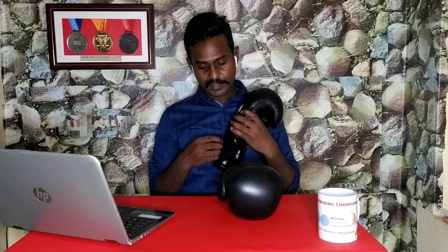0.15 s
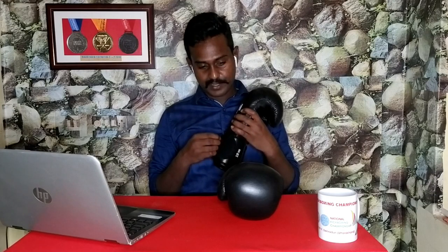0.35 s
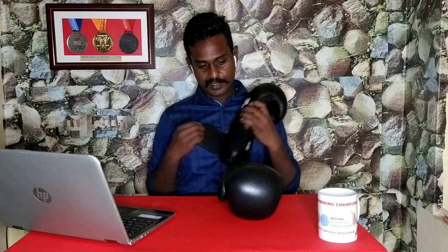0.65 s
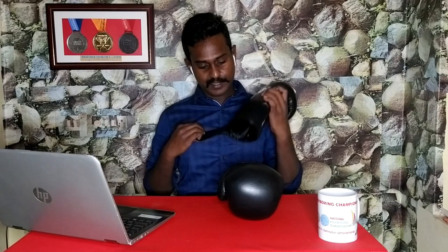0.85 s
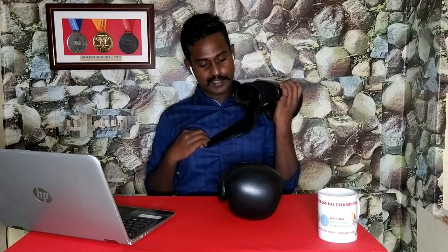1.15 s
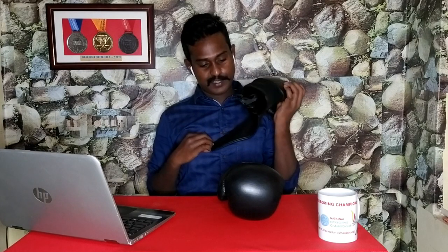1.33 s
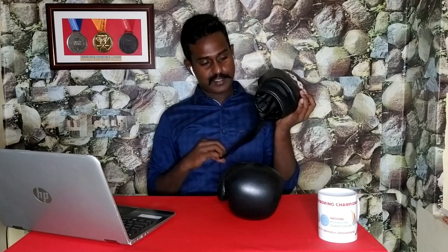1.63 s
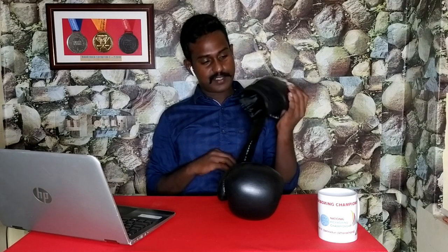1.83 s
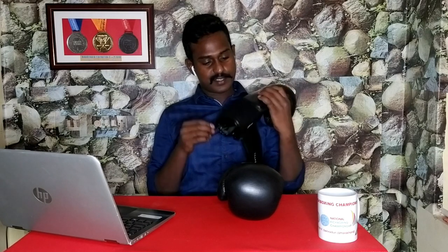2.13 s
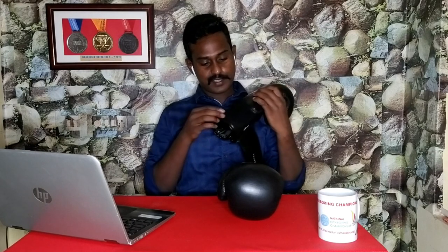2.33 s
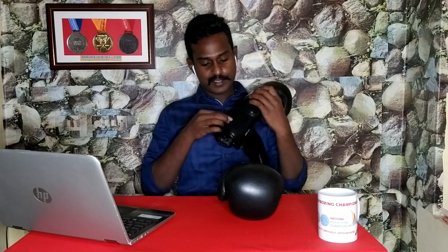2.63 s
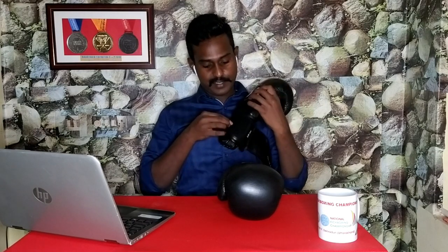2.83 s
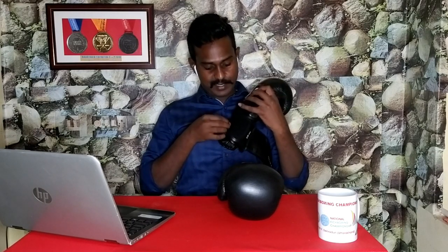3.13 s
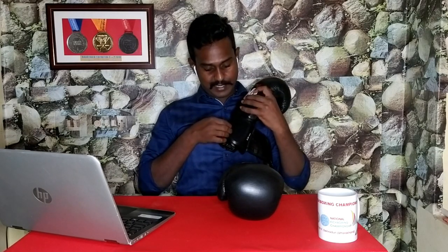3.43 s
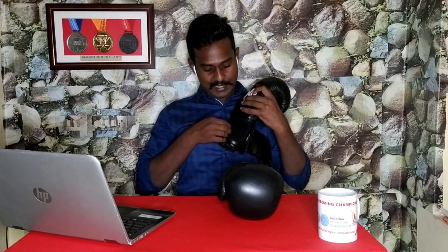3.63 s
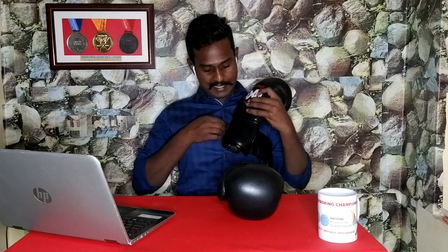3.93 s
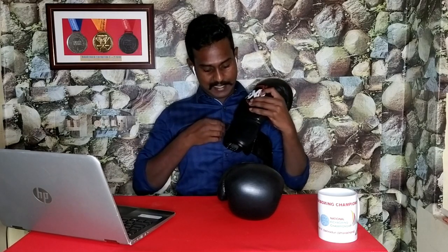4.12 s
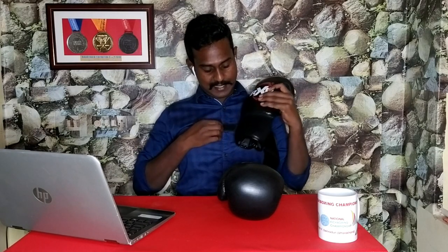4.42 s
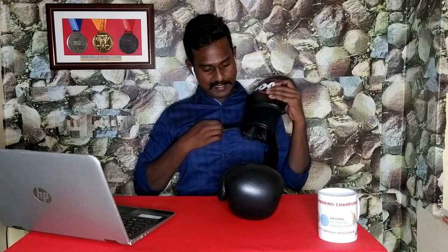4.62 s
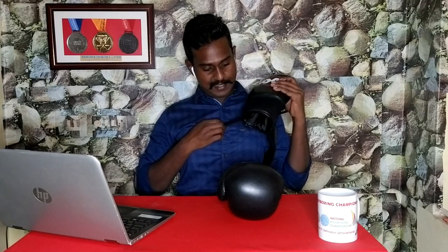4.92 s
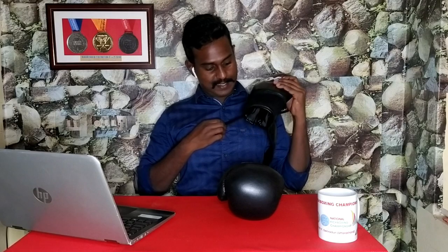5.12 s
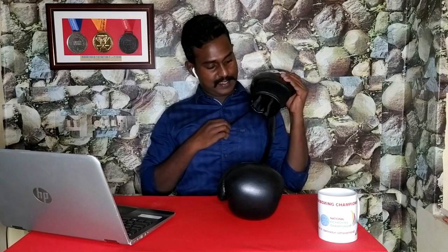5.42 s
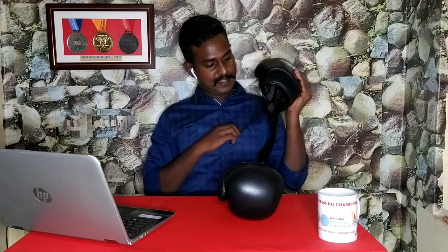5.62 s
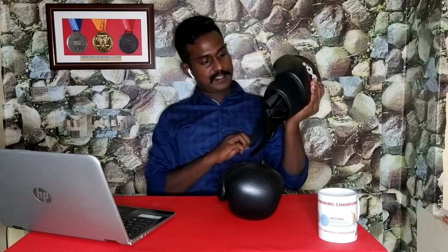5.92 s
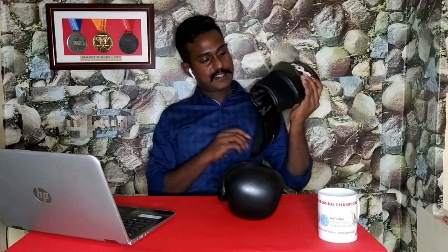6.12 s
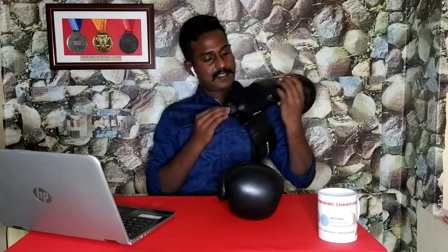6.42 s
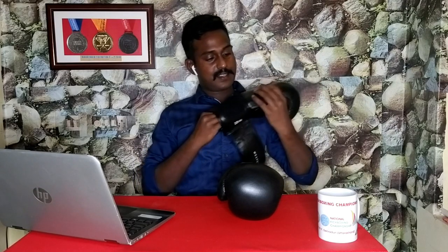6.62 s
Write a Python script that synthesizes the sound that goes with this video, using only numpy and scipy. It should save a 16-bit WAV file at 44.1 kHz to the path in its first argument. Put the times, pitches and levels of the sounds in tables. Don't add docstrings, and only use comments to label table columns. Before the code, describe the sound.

In a small hard-walled room, a padded glove's hook-and-loop strap is torn open in a short, sharp, crackling burst. After a pause with faint cloth rustle and finger ticks, a longer rip comes in uneven tugs, strong at first and weakening into small crackles. A low throbbing fan and soft hiss continue underneath. Stereo microphone one to two metres away.

```python
import sys
import numpy as np
from scipy import signal
from scipy.fft import rfft, irfft, next_fast_len
from scipy.io import wavfile
from scipy.ndimage import uniform_filter1d

SR = 44100
rng = np.random.default_rng(int(sys.argv[2]) if len(sys.argv) > 2 else 0)


def convert_level_to_amplitude(level_db):
    exponent = np.asarray(level_db, float) / 20
    return 10 ** exponent


def master(y):
    cut = np.clip(np.atleast_2d(y).T, -1, 1)
    pcm = np.round(cut * 32767)
    wavfile.write(sys.argv[1], SR, pcm.astype(np.int16))


N = 298111
LONG = next_fast_len(N + SR // 2, real=True)

# [start t/s, glove level/dB re hooks, thud level/dB re hooks, glove growth/(dB/s), thud growth/(dB/s)]
RIPS = [
    (.3, -14, -27, -1.1, 4.3),
    (3.65, -17, -27, 1.46, 4.84),
]


def peel():
    # [start t/s, swell t/s, fade t/s, hooks crest level/dB, strap
    # level/dB re hooks]
    tugs = [
        (.366, .012, 0.02, -31.5, -3.5),
        (.507, 0.013, .02, -30, -7),
        (.519, .038, 0.086, -26.5, -7.5),
        (.692, 0.023, .03, -28.5, -11),
        (.72, 0.055, 0.044, -24.5, -6),
        (.81, 0.089, 0.076, -33, -1),
        (1.011, 0.017, .06, -31.5, -7.5),
        (1.105, 0.038, 0.093, -33, -3.5),
        (1.15, 0.066, .016, -33.5, 2),
            (3.696, 0.0023, .022, -37.5, -5), (3.812, 0.035, 0.067, -29, -4.5),
                 (3.84, .07, 0.097, -30.5, -4.5), (3.92, 0.095, 0.053, -29.5, -4.5),
                 (4.066, 0.056, 0.01, -32.5, -9), (4.262, .035, 0.065, -32, -9.5),
                 (4.29, 0.066, 0.12, -28, -11), (4.391, 0.073, 0.031, -29.5, -13.5),
                 (4.591, .046, 0.11, -31, -11.5), (4.68, 0.074, .01, -31, -15.5),
                 (4.832, .02, 0.011, -35, -12.5), (4.932, 0.011, 0.048, -35, -10),
                 (4.995, 0.054, 0.063, -33.5, -10), (5.115, 0.041, 0.043, -38.5, -11),
                 (5.24, 0.0022, 0.027, -41, -11.5), (5.3, .018, 0.017, -44, -11),
                 (5.336, 0.026, .05, -33, -10.5), (5.459, 0.038, 0.036, -31.5, -11.5),
                 (5.604, 0.028, 0.04, -32.5, -11), (5.64, 0.018, .022, -41, -11)]
    hooks, strap = efforts(tugs, swell_db=7, fade_db=9.5)
    t = np.arange(N) / SR
    rip = (t > RIPS[1][0]) * 1
    start_s, glove_db, thud_db, glove_db_per_s, thud_db_per_s = np.transpose(RIPS)[:, rip]
    glove = hooks * convert_level_to_amplitude(glove_db + glove_db_per_s * (t - start_s))
    thud = hooks * convert_level_to_amplitude(thud_db + thud_db_per_s * (t - start_s))
    drive = clicks(per_s=2600, spread_db=2.5) * convert_level_to_amplitude(1.2 * walk(90) - 3)
    return drive * np.array([hooks, strap, glove, thud])


def snaps():
    # [t/s, peak level/dB,
    # strap level/dB re peak, glove level/dB re peak]
    hook_snaps = [(.2039, -18.5, -14, -23), (.2214, -22, -13, -18.5), (.2269, -20.5, -10.5, -24),
                  (.2949, -20, -17.5, -25), (.2979, -16.5, -15.5, -33), (.3082, -13.5, -16.5, -31.5),
                  (.312, -13.5, -15, -26), (.3341, -14, -22, -29.5), (.3374, -18.5, -21.5, -26.5),
                  (.3424, -16.5, -19.5, -23.5), (.3614, -20, -19, -25.5), (.3676, -14.5, -21.5, -27.5),
                  (.3756, -18.5, -17, -23.5), (.5057, -12, -24.5, -32.5), (.5132, -18, -19.5, -22),
                  (.609, -17.5, -21, -28.5), (.6704, -20, -18.5, -29), (.6928, -15, -15.5, -22),
                  (.733, -14, -24, -20), (1.0096, -15, -14.5, -36), (1.1124, -18, -17, -28),
                  (3.3009, -37, -17, -35), (3.5044, -27, -13.5, -26), (3.6686, -23.5, -17.5, -31.5),
                  (3.697, -24, -17, -31), (3.7234, -21, -25, -31.5), (3.7424, -30, -14, -24),
                  (3.7633, -21.5, -16, -23.5), (3.7868, -18.5, -16.5, -27.5), (3.8132, -17, -17, -28.5),
                  (3.8501, -15, -17, -30.5), (3.9077, -10.5, -12.5, -31), (4.0394, -9.5, -35, -20),
                  (4.0997, -16, -25, -34), (4.1179, -25, -20, -26.5), (4.1859, -19.5, -27, -34),
                  (4.2308, -16.5, -22.5, -19.5), (4.2782, -24, -17, -21), (4.2933, -13.5, -24, -26),
                  (4.5344, -21, -22.5, -30), (4.5905, -34, -9, -25), (4.8334, -16, -23, -27),
                  (4.9342, -19, -35, -19), (5.241, -31, -20, -25), (5.3378, -31, -25, -11),
                  (5.4615, -22, -15.5, -15.5),
                  (0.5466, -13, -20, -28), (0.566, -16, -20, -27.5), (0.8994, -20, -21.5, -28),
               (3.8225, -12.5, -19, -30.5), (3.8774, -12, -20, -28), (3.8924, -14, -21, -28),
               (3.9319, -14, -20, -28), (3.9704, -14.5, -20, -29), (4.3642, -15, -24, -23),
               (4.6778, -14, -25, -38)]
    # [t/s, peak level/dB, glove level/dB re peak]
    ticks = [(.0253, -47.5, -22), (0.0678, -46.5, -20), (.0892, -41.5, -20), (.1645, -60, -9),
             (1.505, -52.5, -13), (1.5589, -51, -7), (1.6457, -45, -23), (1.784, -55, -22),
             (1.9596, -58, -12), (3.2184, -50, -16), (3.2779, -55, -22), (3.3673, -48, -3.5),
             (3.456, -57.5, 8.5), (3.609, -47.5, -1), (5.9005, -56, -5.5)]
    out = np.zeros((4, N))
    t, peak_db, strap_db, glove_db = np.transpose(hook_snaps)
    out[:3, (t * SR).astype(int) + 50] = convert_level_to_amplitude(peak_db + np.array([0 * t, strap_db + 6.0, glove_db - 0.6]))
    t, peak_db, glove_db = np.transpose(ticks)
    out[:3, (t * SR).astype(int) + 50] = convert_level_to_amplitude(peak_db + np.array([0 * t, 0 * t - 5.5, glove_db]))
    return out


def efforts(rows, swell_db, fade_db):
    t = np.arange(N) / SR
    power = np.zeros((2, N))
    for start, swell, fade, crest_db, share_db in rows:
        crest, end = start + swell, start + swell + fade
        on = (t >= start) & (t <= end)
        shape_db = np.interp(t[on], [start, crest, end], [-swell_db, 0, -fade_db])
        power[:, on] += convert_level_to_amplitude(crest_db + shape_db + np.array([[0], [share_db]])) ** 2
    return np.sqrt(power)


def clicks(per_s, spread_db):
    size = convert_level_to_amplitude(spread_db * np.minimum(rng.exponential(size=N), 3.3))
    chance = per_s / SR
    return (rng.random(N) < chance) * size / np.sqrt(chance * np.mean(size ** 2))


def walk(rate_hz):
    hold = int(SR / rate_hz)
    steps = np.repeat(rng.standard_normal(N // hold + 1), hold)
    return 1.3 * uniform_filter1d(uniform_filter1d(steps, hold), hold)[:N]


def peeled():
    t = np.arange(N) / SR
    start_s = np.where(t > RIPS[1][0] - 0.5, RIPS[1][0], RIPS[0][0])
    return np.maximum(t - start_s, 0)


def shake(modes, steady, lone, colour_db, lean_db):
    gains = convert_level_to_amplitude(np.array(modes)[:, 2])
    rings = [resonance(hz, width_hz) for hz, width_hz, _ in modes]
    peak = np.sqrt(sum((g * p) ** 2 for g, (_, p) in zip(gains, rings)))
    out = 0
    for k, (gain, (sos, _)) in enumerate(zip(gains, rings)):
        chance = rng.standard_normal(N)
        sign = np.sign(chance[::-1])
        share = convert_level_to_amplitude(colour_db * chance + lean_db * (k - len(modes) / 2)) * sign
        share = share / np.std(convert_level_to_amplitude(colour_db * chance) * sign) / np.linalg.norm(gains)
        click = (-1) ** k * lone * convert_level_to_amplitude(2.4 * chance) / peak
        out = out + signal.sosfilt(sos, gain * (steady * share + click))
    return out


def resonance(hz, width_hz):
    section = np.concatenate(signal.iirpeak(min(hz, 0.45 * SR), hz / width_hz / 1.537, fs=SR))
    sos = np.array([section, section])
    h = signal.sosfilt(sos, signal.unit_impulse(4096))
    norm = np.sqrt(np.sum(h ** 2))
    sos[0, :3] /= norm
    return sos, np.max(np.abs(h)) / norm


def rustle():
    # [start t/s, swell t/s, fade t/s, crest level/dB, body level/dB re crest]
    moves = [(0, 0.089, 0.067, -59.5, -18), (.15, 0.036, .004, -57.5, -18), (1.5, 0.065, .09, -68, -4),
             (1.638, .006, 0.077, -59, -11), (1.772, 0.0091, 0.068, -68, -15),
             (1.89, 0.071, 0.06, -62.5, -8), (2.06, 0.06, .11, -66.5, -17), (2.47, .076, .15, -76, -8),
             (2.7, 0.043, .2, -66, -10), (2.74, .11, 0.16, -65.5, -5), (3.15, 0.19, 0.24, -62.5, -15),
             (3.506, .004, .16, -57, -24.5), (3.595, 0.021, 0.034, -62, -3.5),
             (5.86, 0.029, 0.13, -65.5, -7.5), (6.17, .03, .045, -69.5, -15.5), (6.69, .03, 0.22, -66, -13)]
    cloth, body = efforts(moves, swell_db=20.5, fade_db=20)
    drive = clicks(per_s=4000, spread_db=6.0) * convert_level_to_amplitude(-5.5)
    return drive * np.array([cloth * convert_level_to_amplitude(-0.2), cloth * convert_level_to_amplitude(-3.5), body, body * convert_level_to_amplitude(5)])


def moving(hands, count, step_s):
    place = np.arange(N) / SR / step_s % count
    out = 0
    for k in range(count):
        away = np.abs((place - k + count / 2) % count - count / 2)
        here = hands * np.cos(np.pi / 2 * np.minimum(away, 1))
        out = out + rfft(here, LONG) * rfft(room(), LONG)
    return irfft(out, LONG)[:, :N]


def room():
    # [f/Hz, T60 t/s]
    decay = [(250, 0.38), (700, 0.42), (1800, 0.45), (4000, 0.31), (8000, 0.37), (13000, 0.36)]
    # [t/ms, left level/dB, right level/dB]
    echoes = [(.15, -5.5, -12.5), (.3, -10, -8), (.5, -0.5, -1.5), (1.6, -12.5, -9), (4.7, -11.5, -15),
              (7.2, -15.5, -10.5), (10.4, -15.5, -16)]
    # [f/Hz, likeness 0-1]
    tail_likeness = [(60, .9), (300, .9), (700, .35), (1100, .0), (3000, 0.1), (8000, 0.04)]
    size = SR // 2
    t, hz = np.arange(size) / SR, np.fft.rfftfreq(size, 1 / SR)
    noise, tail = stereo_noise(size, tail_likeness), 0
    for k, (_, t60_s) in enumerate(decay):
        share = across([(f, j == k) for j, (f, _) in enumerate(decay)], hz)
        tail = tail + irfft(noise * share, size) * np.exp(-np.log(1000) * t / t60_s)
    h = convert_level_to_amplitude(-27.0) * tail * (1 - np.exp(-t / 0.0025))
    for ms, left_db, right_db in echoes:
        at = ms * (1 + 0.2 * rng.standard_normal(2)) * SR / 1000
        h[[0, 1], np.abs(at).astype(int)] += convert_level_to_amplitude(np.array([left_db, right_db])) * rng.choice([-1, 1])
    return h


def fan():
    # [f/Hz, density level/dB per Hz]
    air_spectrum = [(20, -19), (35, -9.5), (70, -8.5), (100, -3.5), (160, -5), (300, -8.5), (480, -8),
                    (620, -17.5), (1200, -22.5), (3000, -26), (6000, -28), (10000, -27), (12500, -28),
                    (16000, -49)]
    # [f/Hz, likeness 0-1]
    air_likeness = [(30, .4), (130, 0.8), (300, 0.5), (640, .4), (1400, 0), (8000, 0.01)]
    # [f/Hz, rms level/dB]
    tones = [(97.6, -82), (102.3, -74.5), (166, -78), (334, -78), (448, -75)]
    hz = np.fft.rfftfreq(LONG, 1 / SR)
    air = irfft(stereo_noise(LONG, air_likeness) * convert_level_to_amplitude(across(air_spectrum, hz)), LONG)[:, :N]
    out = air * convert_level_to_amplitude(-63) / np.std(air)
    for k, (tone_hz, db) in enumerate(tones):
        loose = k > 1
        phase = 2 * np.pi * np.cumsum(tone_hz * (1 + 0.02405 * loose * walk(13))) / SR + 4.05 * k
        out = out + np.sqrt(2) * convert_level_to_amplitude(db + 3.9 * loose * walk(14)) * np.sin(phase)
    return out


def stereo_noise(size, likeness):
    c = np.clip(across(likeness, np.fft.rfftfreq(size, 1 / SR)), 0, 1)
    mid, side = rfft(rng.standard_normal((2, size)))
    mid, side = np.sqrt(1 + c) * mid, np.sqrt(1 - c) * side
    return np.array([mid + side, mid - side]) / np.sqrt(2)


def across(table, hz):
    f, v = np.transpose(table)
    return np.interp(np.log(hz + 1), np.log(f + 1), v)


def starve(x, size=2048, count=4, order=6):
    # [f/Hz, level/dB re treble]
    mask = [(1800, -45), (2600, -18.5), (3500, -10.5), (5000, -10.5), (6500, -3), (7500, -24), (12100, -18),
            (12250, 6), (13200, 0.5), (14200, -15), (15300, -14), (16000, 0)]
    frames = dict(fs=SR, window="cosine", nperseg=size, noverlap=size // 2)
    hz, _, z = signal.stft(x, **frames)
    z = z[:, :-1].reshape(2, -1, count, z.shape[-1])
    hz = hz[:-1].reshape(-1, count).mean(axis=1)[:, None]
    band_db = 10 * np.log10(np.mean(np.abs(z) ** 2, axis=(0, 2)) + 1e-18)
    treble_db = band_db[(hz[:, 0] > 6000) & (hz[:, 0] < 11500)].mean(axis=0)
    top = hz > 12200
    luck_db = 8.5 * uniform_filter1d(rng.standard_normal(band_db.shape), size=4, axis=1)
    wide = np.arange(len(hz)) // order * order
    band_db = np.where(top, uniform_filter1d(band_db, size=order, axis=0)[wide], band_db)
    luck_db = np.where(top, 0.55 * luck_db[wide], luck_db)
    floor_db = np.where(top, -101, -200)
    need_db = np.maximum(treble_db + across(mask, hz), floor_db) + luck_db
    onset = np.diff(treble_db, prepend=0) > 9
    keep = np.array([band_db > need_db, band_db > need_db + 12 * top]) | (onset & (hz < 16000))
    z = (z * keep[:, :, None]).reshape(2, -1, z.shape[-1])
    return signal.istft(np.pad(z, ((0, 0), (0, 1), (0, 0))), **frames)[1][:, :N]


def scene():
    # [f/Hz, width f/Hz, level/dB]
    hook_modes = [(6030, 910, -5), (7360, 1480, -2), (8830, 2060, 0), (10130, 2850, -0.5),
                  (11670, 1800, -4.5), (14840, 4300, -20)]
    strap_modes = [(2670, 720, -5), (3230, 740, -3.5), (3835, 820, 1.5), (4900, 1200, 1)]
    glove_modes = [(737, 324, -4), (1004, 130, -3.5), (1361, 600, -2), (1904, 710, -1)]
    padding_modes = [(200, 56, -8.5), (319, 58, -2.5), (463, 120, -2.5), (574, 360, -3)]
    bodies = hook_modes, strap_modes, glove_modes, padding_modes
    leans_db = np.array([0, -1.1, 1.17, 0])[:, None] * np.minimum(peeled(), 2)
    parts = zip(bodies, peel() + rustle(), snaps(), leans_db)
    hands = sum(shake(modes, steady, lone, 2.5, lean_db) for modes, steady, lone, lean_db in parts)
    return hands + moving(hands, count=5, step_s=0.13) + fan()


def band_limit(x):
    return signal.sosfilt(signal.butter(12, 16050, fs=SR, output="sos"), x)


def record(dry):
    # [f/Hz, left minus right level/dB]
    balance = [(60, 1.5), (400, 0), (1300, -0.5), (4400, 0), (8000, -5), (11000, 3), (13500, 7),
               (16000, 11)]
    tilt_db = across(balance, np.fft.rfftfreq(LONG, 1 / SR)) / 2
    x = irfft(rfft(dry, LONG) * convert_level_to_amplitude(np.array([tilt_db, -tilt_db])), LONG)[:, :N]
    mix = starve(x)
    return band_limit(mix)


dry = scene()
out = record(dry)
master(out)
```